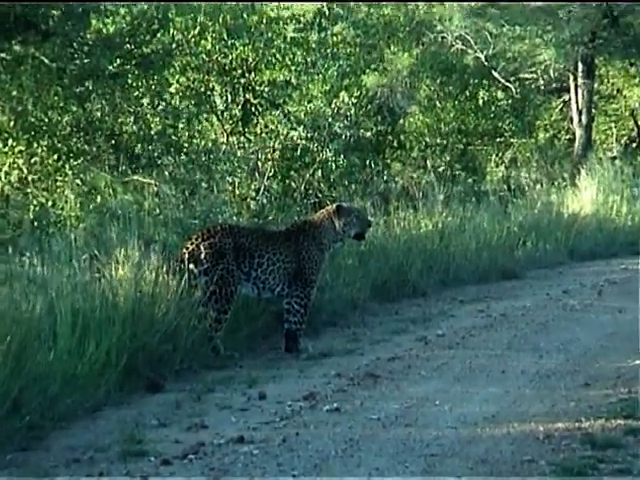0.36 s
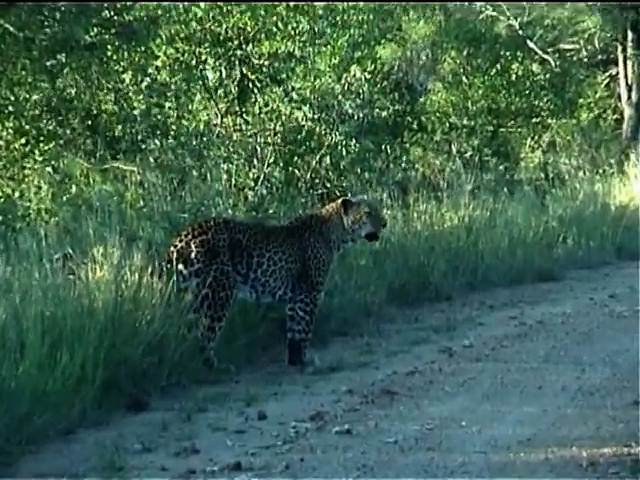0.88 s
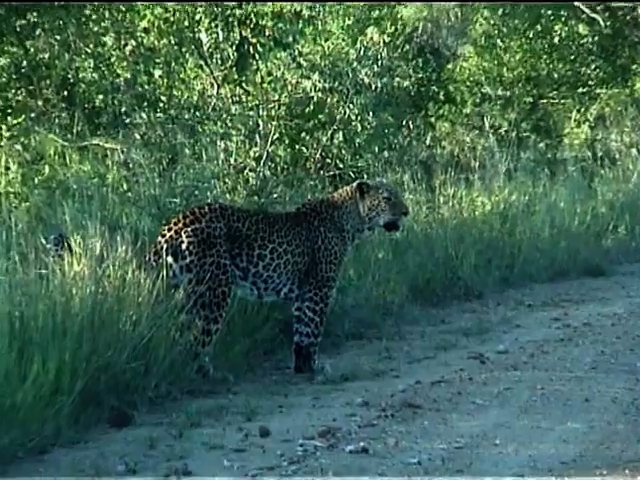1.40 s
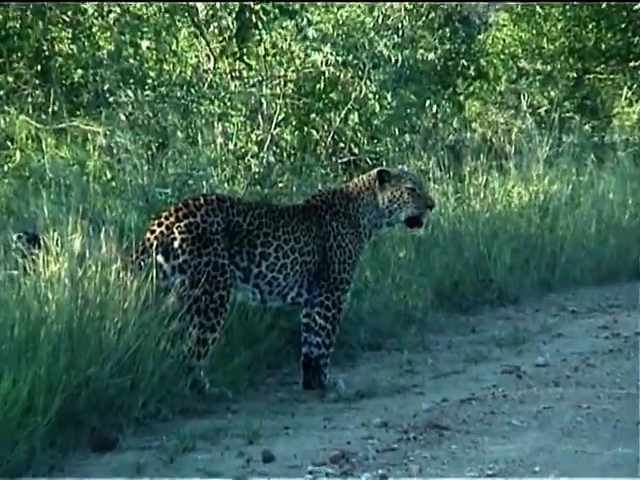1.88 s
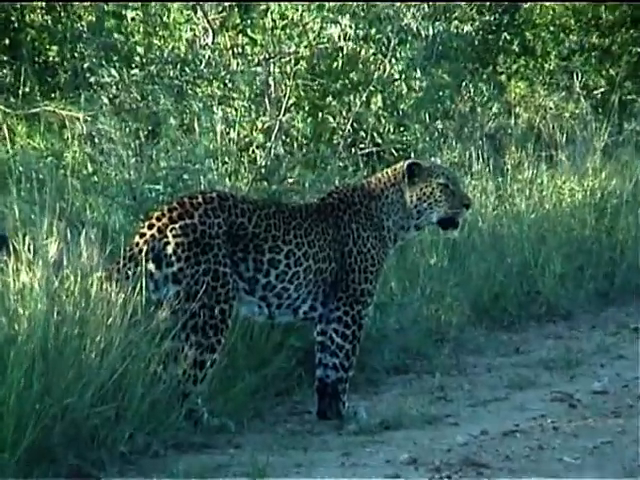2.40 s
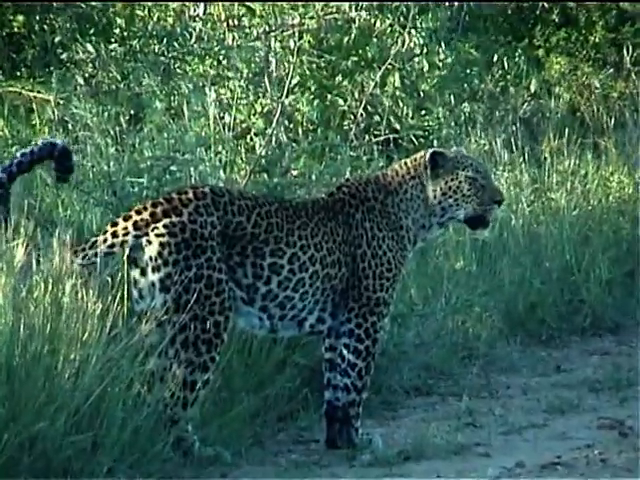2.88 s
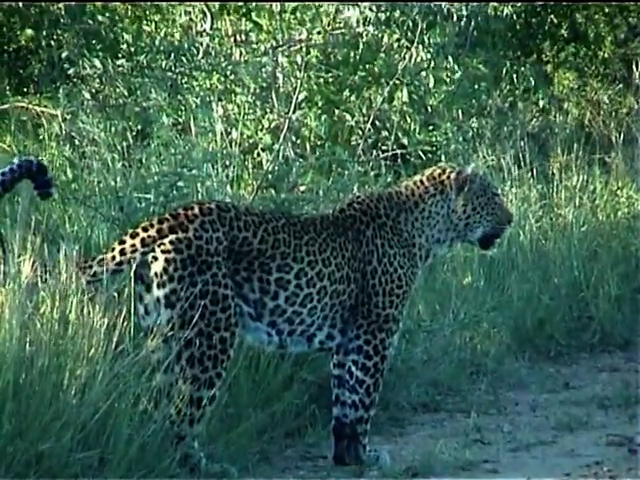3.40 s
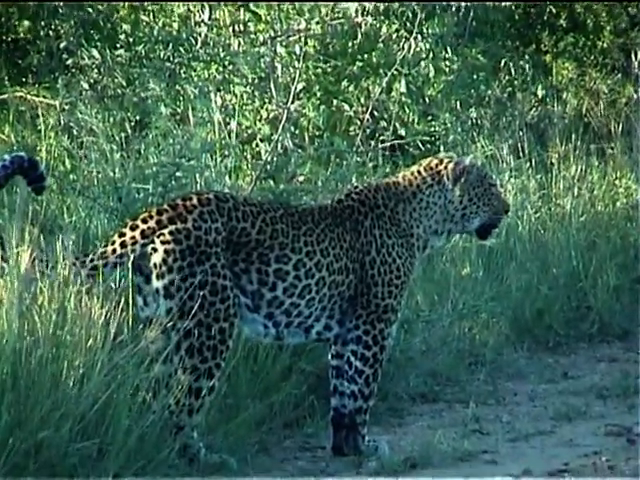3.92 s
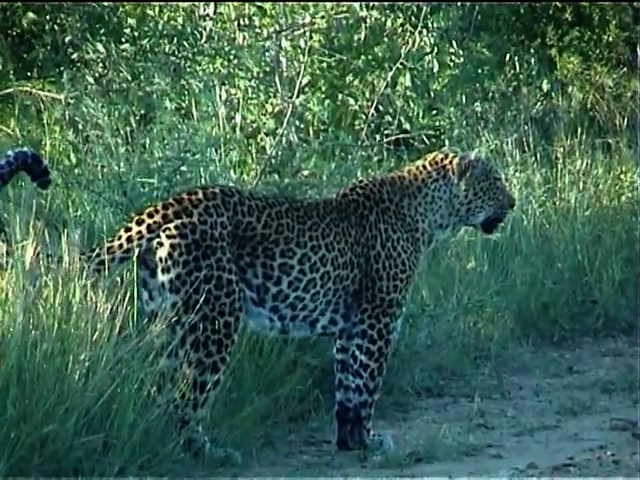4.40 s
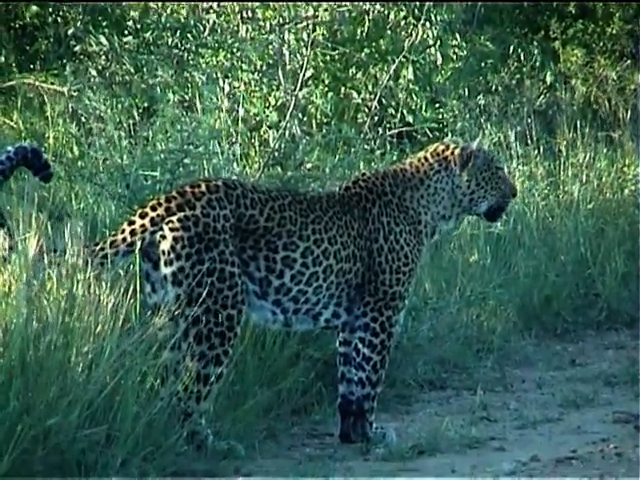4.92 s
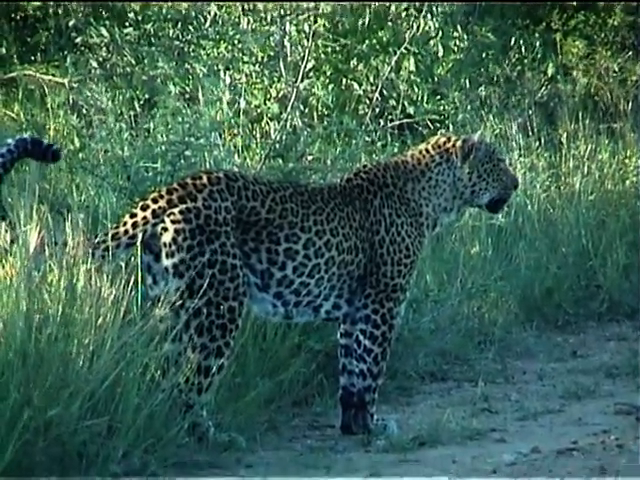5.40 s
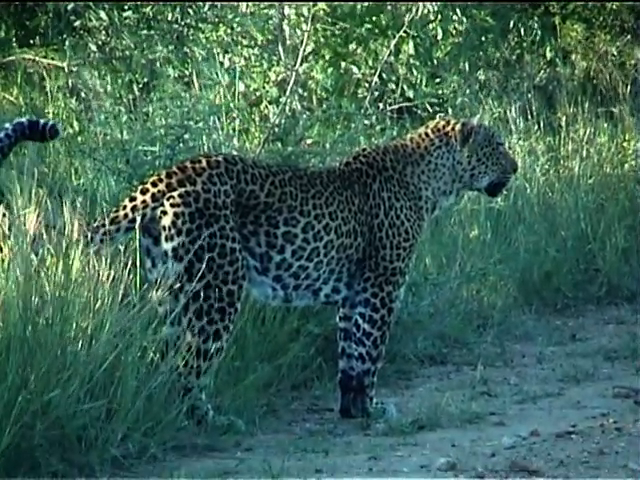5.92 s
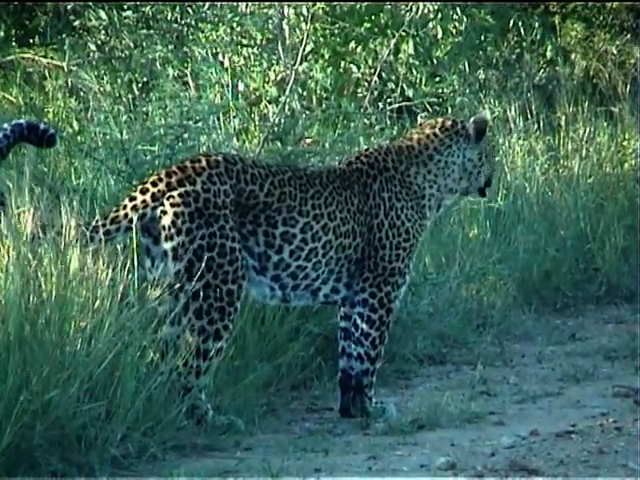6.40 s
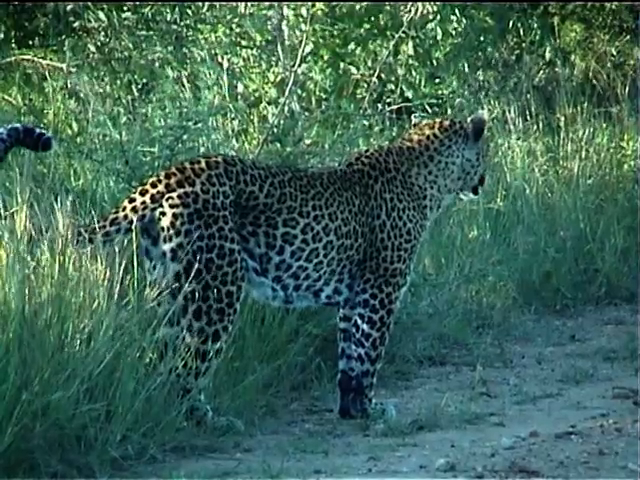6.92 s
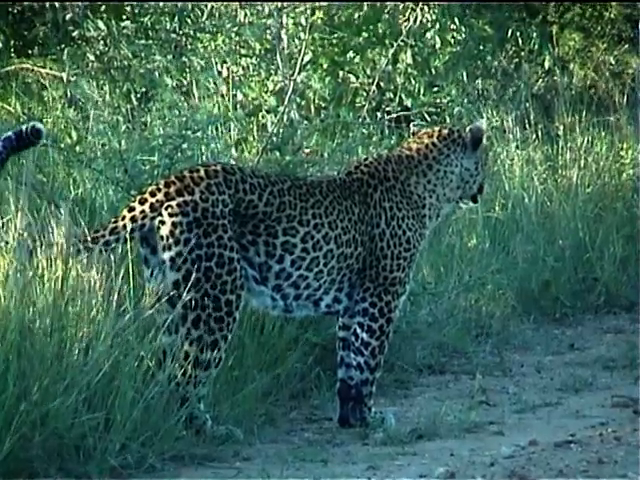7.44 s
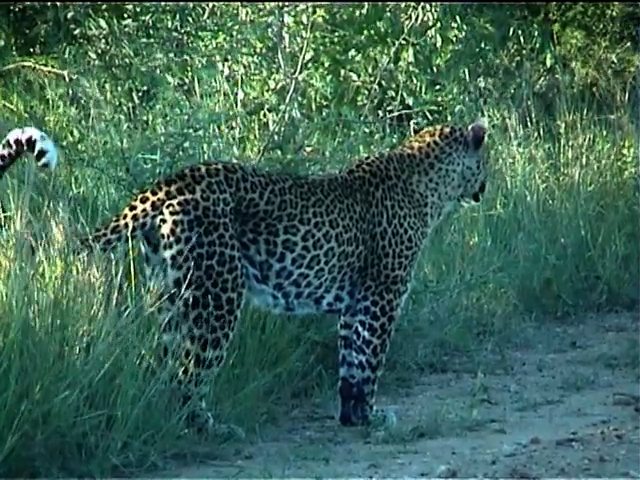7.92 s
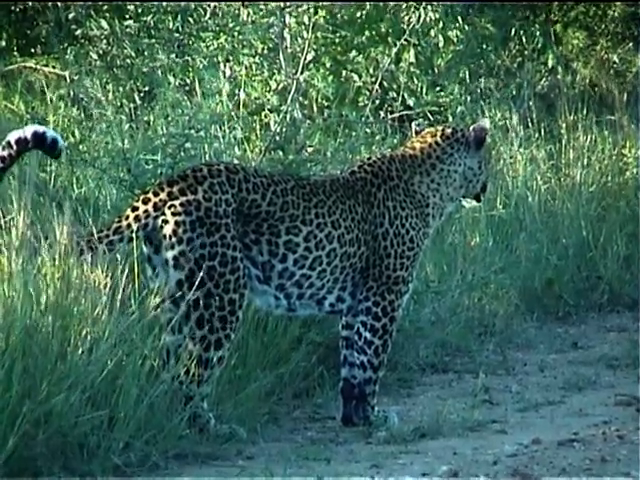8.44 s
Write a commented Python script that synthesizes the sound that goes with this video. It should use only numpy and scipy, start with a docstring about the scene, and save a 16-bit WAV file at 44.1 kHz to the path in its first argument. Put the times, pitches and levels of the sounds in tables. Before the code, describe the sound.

A low, uneven outdoor rumble and very faint hiss open the scene, with tiny distant bird chips and whistles. From about 0.8 seconds a nearer ground bird gives three harsh, trilled calls: a low rattle that lifts and drops, a piercing high squeal sweeping downward around 1.3, and another rattle rising into a rough drawl, ending near 2.1. A short scattered echo comes back from trees. From 2.2 to 5 seconds only distant birds remain, with thin steady and arched whistles, quick falling chips and soft chirrups. Around 5.1 to 6 come faint squawks and quick sweeping notes as the rumble weakens. The caller returns at 6.1 with a similar three-call bout, somewhat brighter, its strong squeal near 6.6 and last drawl ending around 7.4. One faint distant phrase follows near 7.9, and the rumble fades by 8.5. The image is almost mono.

```python
"""A low rumble, faint hiss and far whistles open the scene; then a ground bird gives two bouts of three calls.
Its calls are harsh and trilled: two harmonic voices sound at once and beat in one throat, and an airway
that keeps closing chops them. Trees answer 0.14 s later, as a cluster of scattered noise.
Farther birds whistle, chip and squawk as gliding sines, over shaped noise for rumble, drone and hiss.
The rumble falls midway and again at the end; both channels carry almost the same sound."""
import sys
import numpy as np
from scipy import signal
from scipy.fft import rfft, irfft, next_fast_len
from scipy.io import wavfile
from scipy.ndimage import uniform_filter1d, map_coordinates

SR = 44100
rng = np.random.default_rng(int(sys.argv[2]) if len(sys.argv) > 2 else 0)


def store_wav(level_fs):
    """Save 16-bit WAV to argv[1]."""
    pcm = np.round(np.clip(np.atleast_2d(level_fs), -1, 1) * 32767)
    wavfile.write(sys.argv[1], SR, pcm.T.astype(np.int16))


def how_loud(loudness_db):
    """Turn decibels into a plain amplitude multiplier (0 dB gives 1, 20 dB gives 10)."""
    steps = np.asarray(loudness_db, float) / 20
    return 10 ** steps


N = 377484


def unit(x):
    """Scales a signal to rms 1."""
    return x / np.sqrt(np.mean(np.abs(x) ** 2) + 1e-20)


def along(points, hz):
    """Reads a curve of (Hz, value) points on a log frequency axis."""
    f, v = np.transpose(points)
    return np.interp(np.log(np.abs(hz) + 1), np.log(f + 1), v)


def noise(spectrum):
    """White noise coloured by a spectrum curve, rms 1."""
    m = next_fast_len(N)
    colour = how_loud(along(spectrum, np.fft.rfftfreq(m, 1 / SR)))
    return unit(irfft(rfft(rng.standard_normal(m)) * colour, m)[:N])


def wobble(rate):
    """A smooth random curve with so many knots a second."""
    knots = rng.standard_normal(int(N * rate / SR) + 4)
    return map_coordinates(knots, [np.arange(N) * rate / SR])


def fade(t, length, edge):
    """Soft start and end of a note."""
    return np.sin(np.pi / 2 * np.clip(np.minimum(t, length - t) / edge, 0, 1)) ** 2


def tones(rows, edge, flutter_db):
    """Gliding sines with a faint second harmonic, unsteady in pitch and fluttering in level."""
    out, warble = np.zeros(N + SR), 1 + .004 * wobble(80)
    for s, length, start_hz, middle_hz, end_hz, db in rows:
        t = np.arange(round(length * SR)) / SR
        glide = np.polyfit([0, .5, 1], [start_hz, middle_hz, end_hz], deg=2)
        hz = np.polyval(glide, t / length)
        first = round(s * SR)
        phase = 2 * np.pi * np.cumsum(hz * warble[first:][:len(t)]) / SR
        wave = np.sin(phase) + how_loud(-37.5) * np.sin(2 * phase)
        out[first:][:len(t)] += how_loud(db) * np.sqrt(2) * fade(t, length, edge) * wave
    return out[:N] * how_loud(flutter_db * wobble(90))


# colour of the throat: pitch_hz, level_db
THROAT = [(500, -70), (1050, -9), (2100, -2.5), (2900, 0), (3700, -7), (5000, -2), (6200, -6.5),
          (7500, -17), (11000, -39)]
# spectrum of the vibrating folds' unevenness: pitch_hz, level_db (per Hz)
SHAKE = [(600, 0.5), (2000, -33), (8000, -43.5)]
# brief gliding squeaks beside the caller's low tails and high whistles:
# start_s, length_s, start_hz, middle_hz, end_hz, level_db
SIDE_TONES = [(1.1, 0.011, 4003, 3395, 3000, -45), (1.384, .022, 3150, 3230, 3320, -44),
              (1.445, .012, 3850, 4080, 4200, -46), (6.766, 0.013, 1970, 1560, 1350, -36.5)]
# how each kind of note is sung: beak_hz (resonance), haste (of the glide, no unit), arch_hz,
# loudest (share of the note), swell_db, fade_db
PIP, RATTLE, LIFT = (3294, 1.4, -1, 0.7, 3.5, 22.5), (3600, 8, 0.5, -0.13, 1, 6.5), (3550, 1.4, 170, .6, 1.3, 11)
CHOP, TAIL, HIGH = (2500, 1.8, 0, .25, 5, 15), (2100, 5, 0, .2, 4, 20), (4200, -7, 0, .35, 9, 2)
CROWN, SWOOP, LOW = (4800, 0.88, 440, 0.97, 3.2, 2.6), (4300, 2, 1, 1.38, 7.5, 2), (3397.5, 1.84, -50, 3.6, 1, 2.5)
DRAWL, SAG, UNDER = (3300, 1.5, 0, .2, 4, 1.5), (3000, .8, 0, .1, 1.5, 14), (2800, 6, 0, .12, 2.5, 14)
# notes from the first side of the syrinx: start_s, length_s, start_hz, end_hz, level_db (at the peak)
PIPS = [(1.749, .008, 1643, 1663, -41.5), (6.158, .012, 1441, 1368, -36), (7.071, .008, 1455, 1358, -37.5)]
RATTLES = [(0.863, 0.17, 1278, 971, -42), (1.762, 0.13, 1402, 1004, -38), (6.18, 0.14, 1493, 1015, -33),
           (7.083, .114, 1272, 1004, -38)]
LIFTS = [(1.003, 0.053, 1087, 1680, -46.5), (1.892, 0.055, 1054, 1950, -42),
         (6.32, .048, 1074, 1871, -39.5), (7.196, 0.06, 1049, 1752, -41)]
CHOPS = [(1.073, 0.014, 1402, 1227, -34.5), (1.458, 0.014, 1545, 824.4, -29.5),
         (6.373, .016, 1750, 866.4, -30), (6.749, 0.022, 1796, 799, -31)]
TAILS = [(1.094, .05, 1520, 1018, -39.5), (1.479, .008, 976, 833, -29), (1.487, 0.033, 1062, 912, -33.5),
         (6.396, 0.045, 1425, 1093, -35.5), (6.778, 0.026, 946, 807, -35)]
HIGHS = [(1.281, .124, 4727, 4377, -34), (6.594, 0.086, 4721, 4500, -32)]
LOWS = [(1.406, 0.041, 3353, 3314, -27.5), (6.693, .054, 3339, 3347, -29)]
DRAWLS = [(1.957, .048, 1584, 1780, -32.5), (7.253, .052, 1567, 1830, -37)]
SAGS = [(2.005, .11, 1796, 1565, -38.5), (7.307, .125, 1856, 1727, -35.5)]
# notes from the second side: start_s, length_s, start_hz, end_hz, level_db (at the peak)
THINS = [(1.281, .103, 8665, 8500, -60.5)]
CROWNS = [(6.593, .07, 6556, 6504, -40)]
SWOOPS = [(1.385, .045, 6238, 3396, -36.5), (6.661, 0.04, 6490, 3670, -28)]
UNDERS = [(2.001, .128, 1716, 1057, -35.5), (7.306, .132, 1577, 1254, -35)]


def caller():
    """Two harmonic voices through one throat, with their sum and difference tones, rasp and breath."""
    f1, g1, beak1 = side([(PIP, PIPS), (RATTLE, RATTLES), (LIFT, LIFTS), (CHOP, CHOPS), (TAIL, TAILS),
                          (HIGH, HIGHS), (LOW, LOWS), (DRAWL, DRAWLS), (SAG, SAGS)])
    f2, g2, beak2 = side([(HIGH, THINS), (CROWN, CROWNS), (SWOOP, SWOOPS), (UNDER, UNDERS)])
    t, on = np.arange(N) / SR, g1 + g2 > 0
    # the voice breaks as it lifts, twice as much on every other lift
    breaks = sum(fade(t - s + .012, 0.71 * length, edge=0.0091) for s, length, *_ in LIFTS + LIFTS[::2])
    rasp = 0.02 + .38 * breaks

    def throat(f, peak):
        return how_loud(along(THROAT, f)) * (0.2 + 1 / (1 + ((f - peak) / 700) ** 2))

    k = np.arange(1, 13)[:, None]  # partial numbers
    p1, p2 = (2 * np.pi * np.cumsum(f)[on] / SR for f in (f1, f2))
    clear, jitter = 0, noise(SHAKE)[on]  # uneven cycles blur the high partials most
    for f, g, peak, p in ((f1, g1, beak1, p1), (f2, g2, beak2, p2)):
        drift = np.array([wobble(70)[on] for _ in k])  # the moving beak recolours each partial
        below_nyquist = k * f[on] < SR / 2
        weight = throat(k * f[on], peak[on]) / k ** 0.073 * how_loud(2.1 * drift) * below_nyquist
        partials = weight * np.sin(k * (p + .085 * jitter) + k * k)
        clear = clear + g[on] * np.sum(partials, axis=0) / np.sqrt(np.sum(weight ** 2, axis=0) / 2)
    for m in (1, 2, 3):
        for n in (-2, -1, 1, 2, 3):  # positive: sum tones; negative: much fainter difference tones
            f = m * f1[on] + n * f2[on]
            mix_db = (4 if n > 0 else -30) - 5 * (m + abs(n) - 2)
            mix_gain = np.sqrt(g1 * g2)[on] * how_loud(mix_db + along(THROAT, f))
            clear = clear + mix_gain * np.sin(m * p1 + n * p2 + m * n)
    voiced = np.zeros(N)
    voiced[on] = clear
    shake = unit(noise(SHAKE) + wobble(540))  # uneven folds smear every partial
    breath = how_loud(-24.5) * (g1 * (f1 < 2500) + g2 * (f2 < 2500)) * noise(THROAT)
    rough = voiced * (np.sqrt(1 - np.clip(rasp, 0, 1) ** 2) + rasp * shake)
    return rough + breath + tones(SIDE_TONES, edge=0.006, flutter_db=-3)


# trills, as runs of airway closures at a nearly steady beat: start_s (first closure), gap_s, count
TRILLS = [(0.878, 0.018, 8), (1.284, 0.013, 4), (1.344, .0148, 3), (1.396, .0095, 4), (1.466, .01, 1),
          (1.772, .0132, 7), (6.196, .014, 4), (6.596, 0.0099, 4), (6.669, 0.012, 4), (7.094, 0.016, 6)]


def side(kinds):
    """One side of the syrinx: pitch, gain and beak resonance at each sample, chopped by the closing airway."""
    t = np.arange(N) / SR
    hz, gain, beak, age = np.zeros(N), np.zeros(N), np.full(N, 3e3), np.zeros(N)
    for (beak_hz, haste, arch_hz, loudest, swell_db, fade_db), notes in kinds:
        for s, length, start_hz, end_hz, db in notes:
            now = slice(round(s * SR), round((s + length) * SR))
            age[now], beak[now] = t[now] - s, beak_hz
            u = age[now] / length
            glide = np.expm1(-haste * u) / np.expm1(-haste)
            hz[now] = start_hz + (end_hz - start_hz) * glide + arch_hz * np.sin(np.pi * u)
            swell = swell_db * (1 - u / loudest)
            decay = fade_db * ((u - loudest) / (1 - loudest)) ** 2
            loss_db = np.where(u < loudest, swell, decay)
            soft = fade(age[now], length, edge=0.0012)
            gain[now] = how_loud(db - loss_db) * soft + gain[now] * (1 - soft)  # overlapping notes are slurred
    shut = np.sort([s + i * gap for s, gap, count in TRILLS for i in range(int(count))])
    scatter_s = 0.0027 * wobble(60)
    shut = np.sort(shut + scatter_s[(shut * SR).astype(int)])
    k = np.clip(np.searchsorted(shut, t), 1, len(shut) - 1)
    since, until = np.abs(t - shut[k - 1]), np.abs(shut[k] - t)
    # opening and closing have different slopes; early in a note the airway stays shut longer
    early = np.exp(-age / 0.1)
    opening = np.exp(-(since / (0.001 + 0.0021 * early)) ** 2)
    closing = np.exp(-(until / (0.0022 + 0.0006 * early)) ** 2)
    dip = np.maximum(opening, closing)
    effort = np.clip(uniform_filter1d(gain, size=600) / how_loud(-34), 0, 1)  # a hard-blown note shuts less
    depth = np.clip(.8 + .5 * early - .45 * effort, 0, .97)
    # each puff starts sharp and sags
    bend_hz = 110 * depth * (np.exp(-since / 0.0058) - 0.83 * np.exp(-until / 0.0046))
    return (hz + bend_hz) * (1 + .008 * wobble(400)) * (hz > 0), gain * (1 - depth * dip), beak


# ticks of air: start_s, level_db (before a 3.5 dB cut)
CLICKS = [(0.8366, -52.5), (1.7194, -50), (6.124, -53.5), (7.0464, -46.5)]


def clicks():
    """Short ticks of air through the throat: noise that starts at once and dies in about a millisecond."""
    t, air_noise = np.arange(N) / SR, noise(THROAT)
    return air_noise * sum(how_loud(db - 3.5) * np.exp(-np.abs(t - s) / 0.00078) * (t > s) for s, db in CLICKS)


# spectrum of the bush hiss, also the colour of far breath: pitch_hz, level_db
HISS = [(400, -14), (1200, -12), (2400, -7.5), (3500, -1.5), (5500, -11), (8300, -27.5), (11000, -47)]
# parts of one three-note phrase, one squawk and one softer two-voiced chirrup:
# start_s (within the figure), length_s, start_hz, middle_hz, end_hz, level_db (relative to the figure)
PHRASE = [(0, .036, 3950, 4020, 3950, 1), (.028, .026, 3800, 3700, 3600, -2),
          (.05, .042, 3000, 3280, 2950, 0)]
SQUAWK = [(.004, .024, 2750, 2720, 2520, -3), (.015, .037, 4300, 3700, 3300, 0),
          (.048, .026, 2550, 2900, 2650, -2), (0, .052, 2300, 1900, 1650, -13),
          (.012, .036, 5500, 5150, 4900, -20), (.008, .03, 4800, 4300, 3900, -12),
          (.066, .012, 3900, 3200, 2400, -9)]
CHIRRUP = [(0, 0.055, 2095, 2380, 2670, -9.5), (.012, 0.039, 3280, 3520, 3520, -2.5)]
# when each figure is sung: start_s, level_db
PHRASES = [(5.382, -55.5), (7.94, -62)]
SQUAWKS = [(5.1, -60.5), (5.263, -60), (5.68, -59.5)]
CHIRRUPS = [(3.595, -62), (3.935, -64.5), (4.43, -71.5)]
# series of falling chips: start_s, gap_s, count (rounded down), level_db
CHIPS = [(0.012, 0.057, 2.6, -78), (2.522, 0.04, 6.1, -85), (3.462, 0.049, 7.8, -79),
         (4.518, 0.042, 9.3, -79)]
# pitches of the rising whistle: start_hz, middle_hz, end_hz
RISE_HZ = (3070, 3480, 4020)
# rising whistles: start_s, length_s, level_db
RISES = [(4.225, .11, -73), (4.573, .105, -72.5)]
# outer pitches of the arched whistle: start_hz, end_hz
ARCH_HZ = (2780, 2620)
# arched whistles: start_s, length_s, top_hz, level_db
ARCHES = [(2.552, 0.22, 2853, -63.5), (2.879, 0.22, 2890, -67.5), (3.192, 0.19, 3014, -68),
          (3.462, .18, 3002, -68), (3.719, .13, 3040, -68)]
# single notes: start_s, length_s, start_hz, middle_hz, end_hz, level_db
SINGLES = [(0.01, 0.027, 1940, 2290, 2290, -72), (0.2, 0.058, 4030, 3850, 3420, -75.5),
           (0.349, 0.036, 2200, 2285, 2400, -71), (0.667, 0.015, 4570, 4400, 4070, -63.5),
           (0.67, 0.022, 3860, 3700, 3350, -71.5), (0.787, 0.07, 1950, 1780, 1720, -81.5),
           (2.172, 0.25, 2625, 2630, 2646, -62.5), (2.344, 0.031, 3900, 3980, 3790, -72.5),
           (3.746, 0.068, 3140, 4020, 3280, -65), (5.589, 0.067, 1300, 1420, 1370, -84),
           (5.88, 0.038, 3850, 3460, 3330, -61), (5.934, 0.026, 3200, 2993, 2690, -63.5),
           (5.947, 0.041, 3916, 3640, 3170, -60), (5.475, .045, 3900, 3660, 3300, -62.5)]


def farther_birds():
    """Sines for whistles and falling chips; rougher ones for phrases, squawks, chirrups and scattered tones."""
    chips = [(s + i * gap, .022, 4950, 4600, 4200, db)
             for s, gap, count, db in CHIPS for i in range(int(count))]
    figures = [(s + delay, *shape, db + relative_db)
               for figure, times in ((PHRASE, PHRASES), (SQUAWK, SQUAWKS), (CHIRRUP, CHIRRUPS))
               for s, db in times for delay, *shape, relative_db in figure]
    whistles = [(s, length, *RISE_HZ, db) for s, length, db in RISES]
    whistles += [(s, length, ARCH_HZ[0], top_hz, ARCH_HZ[1], db) for s, length, top_hz, db in ARCHES]
    pure = tones(whistles + SINGLES + chips, edge=.008, flutter_db=1.5) * (1 + .13 * wobble(1500))
    rough = tones(figures + list(scattered_tones()), edge=.009, flutter_db=2.5)
    rough = rough * (1 + .2 * noise(SHAKE) + .2 * wobble(900))
    loudness = np.sqrt(np.abs(uniform_filter1d(rough ** 2, size=500)))
    breath = how_loud(-20) * loudness * noise(HISS)
    return pure + rough + breath


# levels of the air over time: start_s, rumble_db, drone_db, hiss_db (before a 2 dB cut)
AIR = [(0, -59, -81, -80.5), (2.4, -59.5, -80, -78.5), (4.801, -60, -79.5, -82), (4.95, -64.5, -84, -85),
       (5.85, -68.5, -92.5, -77.5), (7.301, -65.5, -89, -79), (8.56, -80.5, -102, -92)]


def scattered_tones():
    """Faint short random gliding tones scattered through the hiss, following its level."""
    when, pitch, glide, arch, size = rng.standard_normal((340, 5)).T
    s = (N / SR - .2) * (np.arange(len(when)) + .5 + .4 * np.tanh(when)) / len(when)
    hz = 3200 * np.exp(.42 * np.tanh(pitch))
    hiss_db = np.interp(s, np.transpose(AIR)[0], np.transpose(AIR)[3])
    length_s = .028 * np.exp(0.14 * when)
    glide, arch = .1 * glide, .05 * arch  # as log pitch ratios
    level_db = hiss_db - 2 + 5 * np.tanh(size)
    return np.transpose([s, length_s, hz * np.exp(-glide), hz * np.exp(arch), hz * np.exp(glide), level_db])


def trees(x, t60, slap_s, slap_db):
    """Scattered sound off the bush: a dying haze and a later cluster from a line of trees."""
    t = np.arange(SR // 2) / SR
    haze = how_loud(-60 * t / t60) * (t > .004)
    slap = how_loud(slap_db) * np.exp(-((t - slap_s) / 0.022) ** 2)
    tail = (haze + slap) * rng.standard_normal(len(t))
    band = signal.butter(2, [1300, 5500], "bandpass", fs=SR, output="sos")
    tail = signal.sosfilt(band, tail / np.linalg.norm(tail))
    stir = .9 + .35 * wobble(300)  # moving leaves blur the echo
    return signal.fftconvolve(x * stir, tail)[:N]


def patchy(x, depth_db):
    """Random patches of gain across time and frequency, rms 1."""
    z = signal.stft(x, nperseg=512)[2]
    field = uniform_filter1d(rng.standard_normal(z.shape), size=9, axis=0)
    field = uniform_filter1d(field, size=8, axis=1)
    return unit(signal.istft(z * how_loud(depth_db * unit(field)), nperseg=512)[1][:N])


# spectra of the rumble and the drone: pitch_hz, level_db (per Hz)
RUMBLE = [(12, -32.5), (22, 1), (36, 7), (50, -6), (75, -16), (110, -72)]
DRONE = [(80, -1.5), (175, 2), (230, -10), (1200, -38.5)]


def air():
    """A low uneven rumble, a faint drone above it, and the patchy hiss of far leaves, all shaped noise."""
    s, *levels = np.transpose(AIR)
    rumble_db, drone_db, hiss_db = (np.interp(np.arange(N) / SR, s, db) for db in levels)
    rumble = how_loud(rumble_db + 1.4 * wobble(23)) * noise(RUMBLE)
    drone = how_loud(drone_db + wobble(16.0)) * noise(DRONE)
    hiss = how_loud(hiss_db - 2 + wobble(9)) * patchy(noise(HISS), depth_db=4)
    return rumble + drone + hiss


# faint low tones under the high whistles: start_s, length_s, start_hz, middle_hz, end_hz, level_db
UNDERTONES = [(1.29, 0.14, 739, 767, 515.8, -83.5), (6.6, 0.16, 850, 698.3, 551.7, -81.5)]


def scene():
    """The caller near, the other birds far, each with its echo off the trees, over the air."""
    near, far, first_bout = caller() + clicks(), farther_birds(), np.arange(N) < 4 * SR
    # a small bird radiates no bass
    near = signal.sosfilt(signal.butter(4, 860, "highpass", fs=SR, output="sos"), near)
    lag = round(SR / 2000)  # half a millisecond: a bounce off the ground in the first bout
    near = near + .5 * first_bout * np.roll(near, lag)
    # the head is turned away in the first bout, which dulls the treble
    turned = signal.sosfilt(signal.butter(2, 5500, fs=SR, output="sos"), near)
    near = np.where(first_bout, turned, near)
    near = near + tones(UNDERTONES, edge=.02, flutter_db=5)
    far = far + how_loud(-6) * trees(far, t60=.12, slap_s=.1, slap_db=-34)
    mono = near + how_loud(-15) * trees(near, t60=0.22, slap_s=0.14, slap_db=-15.5) + far
    # faint random level flutter, opposite in the two channels
    flutter = how_loud(-36.0) * noise(SHAKE) * [[1], [-1]]
    return mono * (1 + flutter) + air()


def roll_off(x):
    """The treble ends steeply here."""
    return signal.sosfilt(signal.butter(12, 11400, fs=SR, output="sos"), x)


def record(dry):
    """A slightly lopsided microphone bends the wave; each channel has its own faint noise floor."""
    bent = dry + 0.62 * dry ** 2
    wired = bent + how_loud(-121) * rng.standard_normal(dry.shape)
    return roll_off(wired)


dry = scene()
out = record(dry)
store_wav(out)
```